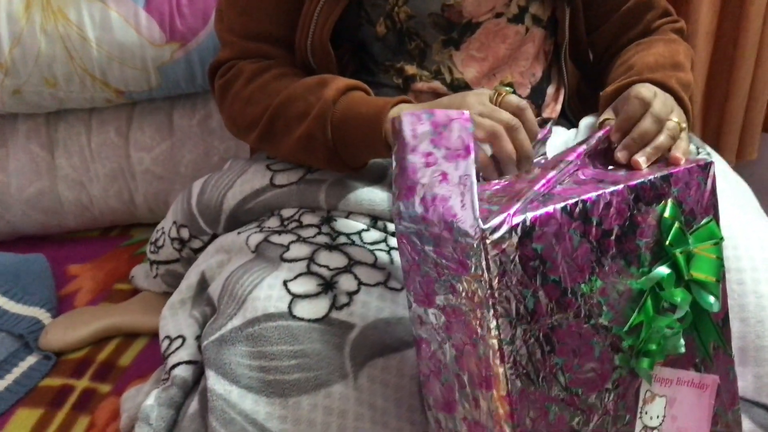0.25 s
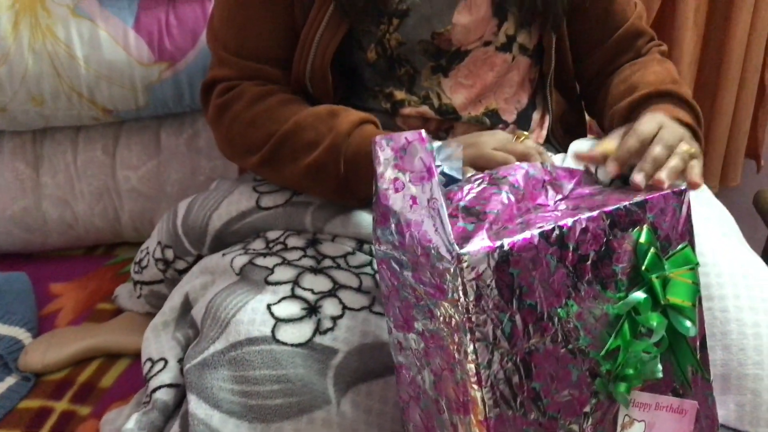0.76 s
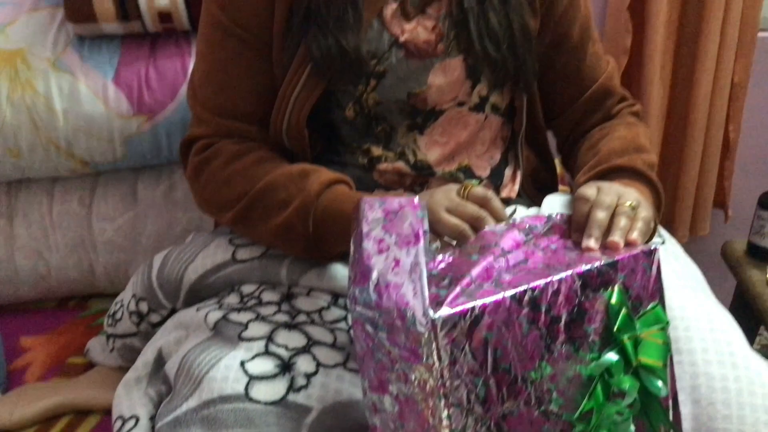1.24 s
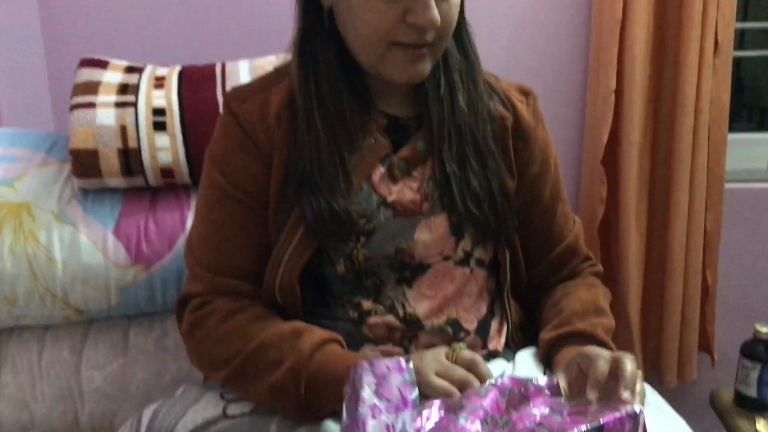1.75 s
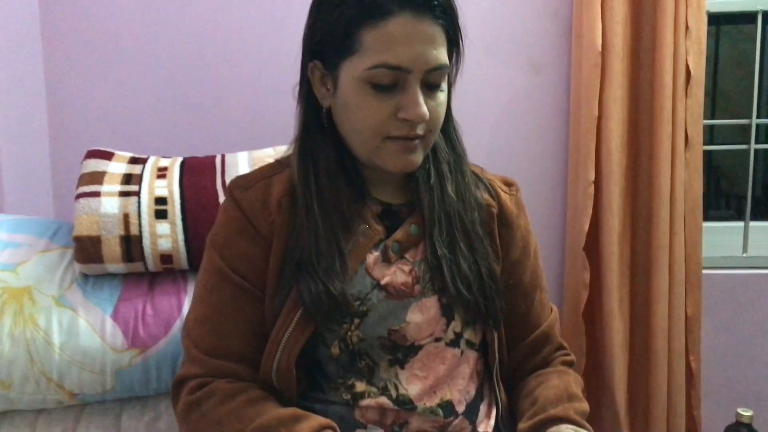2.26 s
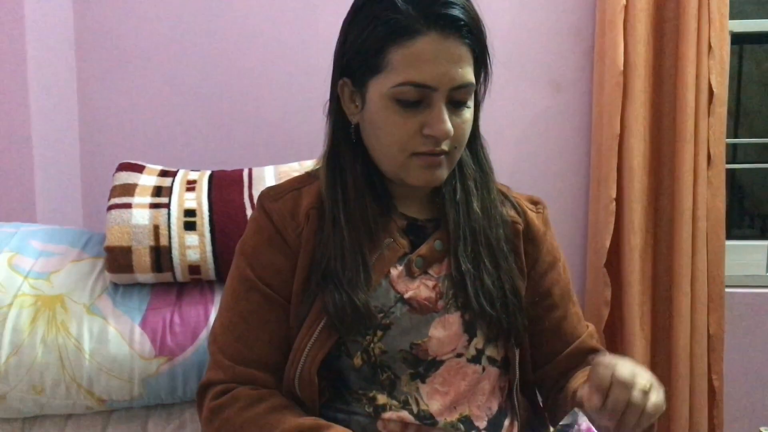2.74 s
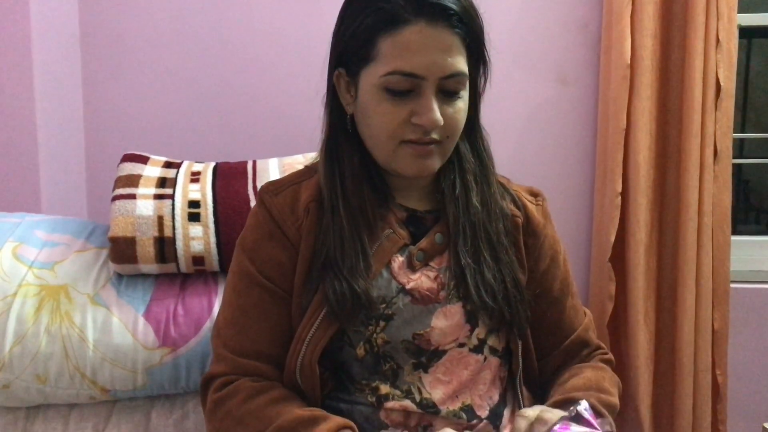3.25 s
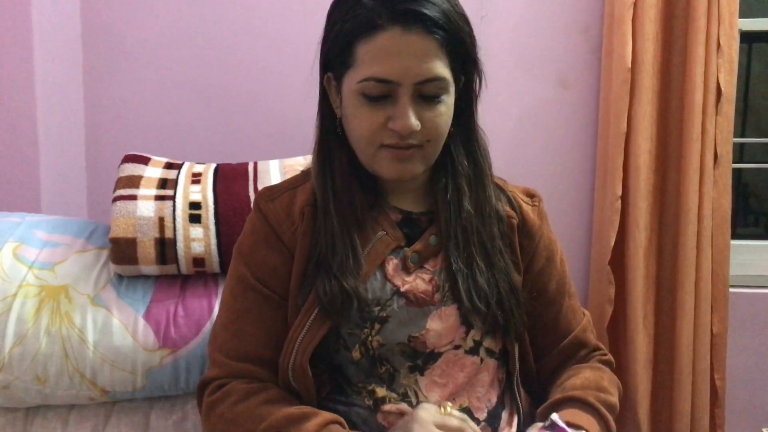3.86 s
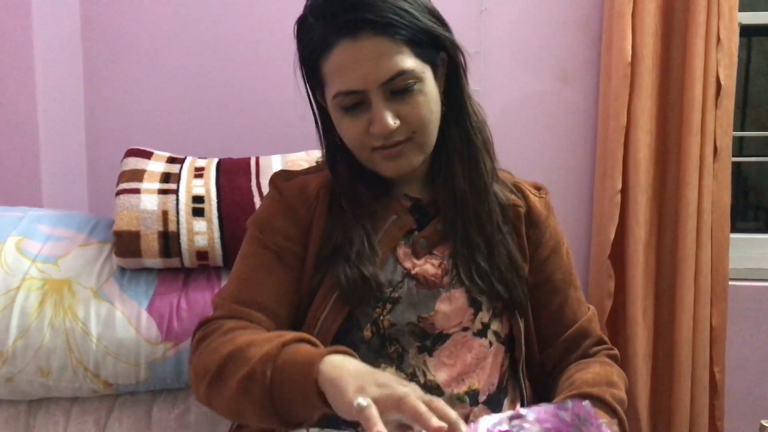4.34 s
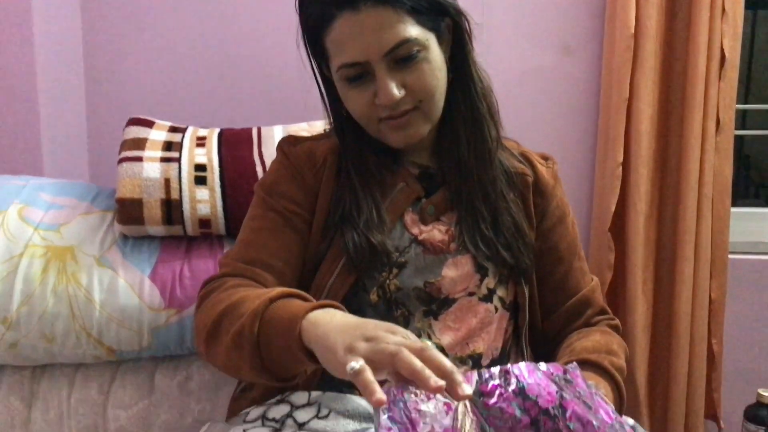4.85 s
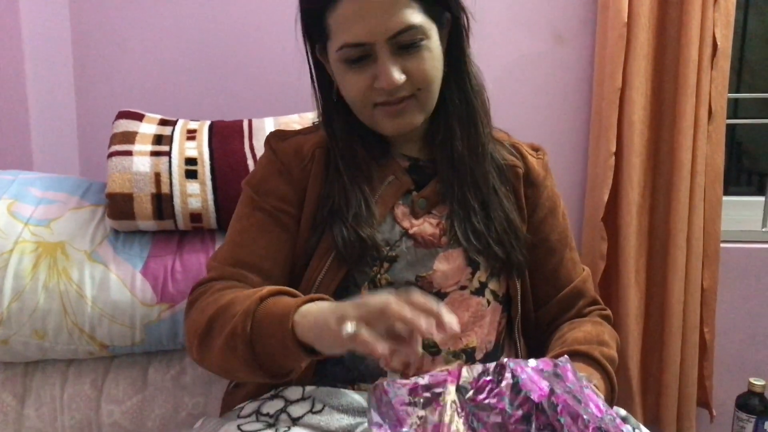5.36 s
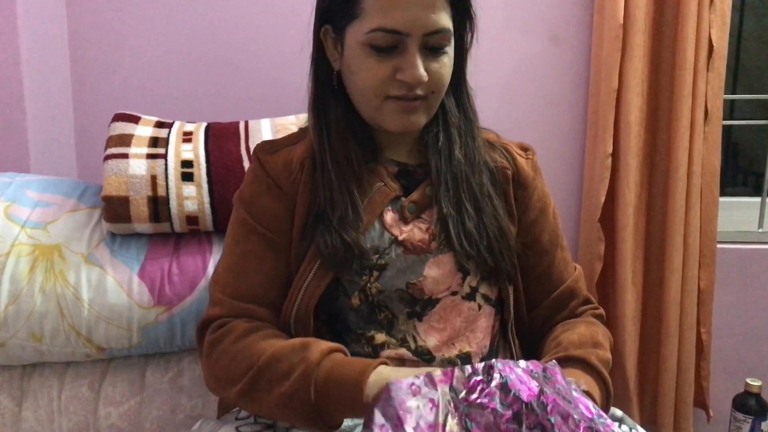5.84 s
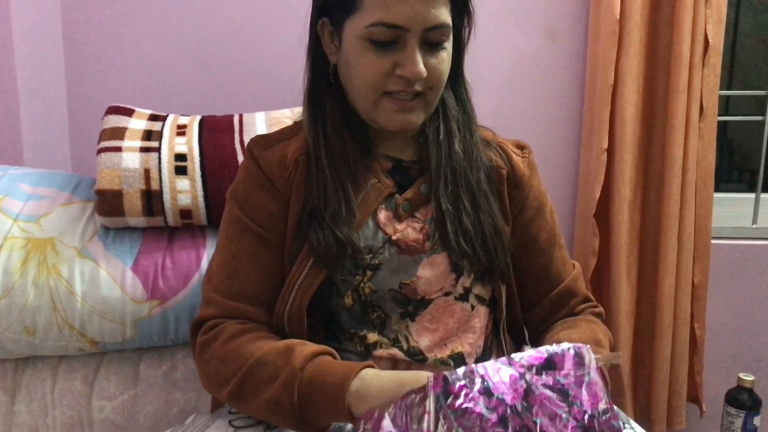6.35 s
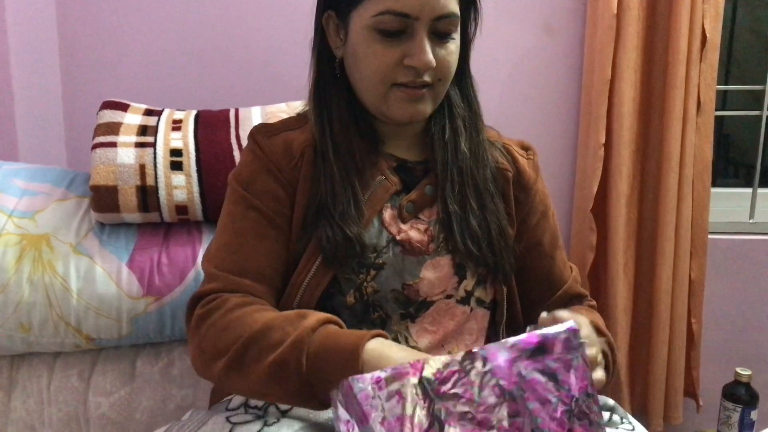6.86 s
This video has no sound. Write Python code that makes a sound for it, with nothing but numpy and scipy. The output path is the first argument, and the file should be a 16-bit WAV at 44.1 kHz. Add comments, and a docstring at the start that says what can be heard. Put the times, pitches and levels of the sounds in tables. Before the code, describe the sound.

Close, dry crinkling of gift foil: dense swarms of tiny crackles and sharp snaps at first, box bumps ringing low and brief beneath. It eases to soft rustling, surges once more with two thuds, and nearly dies away. Near the end a little tape zip leads to the hardest cracks, faint thuds and last snaps. A quiet bedroom hums low behind, with light early reflections picked up by a handheld phone.

```python
"""Hands pull foil wrapping off a cardboard box in a small quiet bedroom; a murmur and faint hiss run under it all.
0-2.9 s: creases snap sharply (slips plus brief modes), buckle swarms crackle, bumps thud (ringing box modes).
2.9-3.7 s: gentler, limper foil. 3.8-4.4 s: firm pulls again, with two thuds. 4.6-5.9 s: mostly faint crackle.
5.9-7.1 s: a tiny zip of tape (stick-slip), the loudest snaps near 6.3 s, faint thuds, then last snaps.
Slack folds pop hollowly here and there (close modes); the room adds early reflections and a dull, diffuse tail."""
import sys
import numpy as np
from scipy import signal
from scipy.fft import rfft, irfft
from scipy.io import wavfile
from scipy.ndimage import uniform_filter1d

SR = 44100
rng = np.random.default_rng(int(sys.argv[2]) if len(sys.argv) > 2 else 0)


def digitize_waveform(pressure):
    """Quantize a signal to 16-bit integers and store it at the path in sys.argv[1].

    Rows of a 2-D input are taken as channels; values are limited to [-1, 1].
    """
    field = np.atleast_2d(pressure).T
    bounded = np.clip(field, -1, 1)
    quanta = np.round(bounded * 32767).astype(np.int16)
    wavfile.write(sys.argv[1], SR, quanta)


N = 313110
TIME_S = np.arange(N) / SR


def undb(db):
    """Decibels to amplitude gain."""
    return 10 ** (np.asarray(db) / 20)


def rms(x):
    """Root mean square."""
    return np.sqrt(np.mean(x ** 2) + 1e-20)


def unit(x):
    """Scale to an energy of one."""
    return x / np.sqrt(np.sum(x ** 2) + 1e-20)


def fade(t_s, t60_s):
    """Exponential decay, 60 dB down after t60_s."""
    return np.exp(-np.log(1000) * t_s / t60_s)


def add(track, at_s, sound):
    """Mix a sound into the track at at_s."""
    start = int(np.clip(at_s * SR, 0, N - 1))
    track[start:start + len(sound)] += sound[:N - start]


def butter(hz, kind, order=3):
    """Butterworth coefficients."""
    return signal.butter(order, hz, kind, fs=SR)


def colour(x, points):
    """Filter by a spectrum of (f/Hz, level/dB) points, interpolated over log frequency."""
    points_hz, points_db = np.transpose(points)
    bins_hz = np.maximum(np.fft.rfftfreq(len(x), 1 / SR), 1)
    gain_db = np.interp(np.log(bins_hz), np.log(points_hz), points_db)
    return irfft(rfft(x) * undb(gain_db), len(x))


def flicker(hold_s):
    """Random values held for hold_s and smoothed, rms of one."""
    hold = max(int(hold_s * SR), 32)
    steps = rng.standard_normal(N // 32 + 1)[np.arange(N) // hold]
    smooth = uniform_filter1d(steps, hold)
    return smooth / rms(smooth)


# still air of the room, spectrum: f/Hz, relative level per Hz/dB
AIR_SPECTRUM = [(15, -51), (25, -7.5), (133, -5), (204, -6.5), (289, -10), (322, -11), (359, -11.5),
                (410, -16), (537, -16.5), (703, -15), (782, -17), (6050, -34), (10600, -32.5), (15500, -34)]
AIR_DB = -52.5


def air():
    """Steady low murmur of the house under a faint hiss: coloured noise."""
    noise = colour(rng.standard_normal(N), AIR_SPECTRUM)
    noise = signal.lfilter(*butter(49, "high"), noise)
    return noise / rms(noise) * undb(AIR_DB)


def bedroom(x, wet_db, t60_s, dull_hz=6000, first_s=.006, size=22000, count=10):
    """A few early reflections and a diffuse tail, dulled by bedding and curtains."""
    t_s = np.arange(size) / SR
    noise = rng.standard_normal(size)
    reflections = rng.integers(int(first_s * SR), int(.03 * SR), count)
    noise[reflections] += 9 * rng.choice([-1, 1], count)
    dulled = signal.lfilter(*butter(dull_hz, "low", order=1), noise)
    tail = dulled * fade(t_s, t60_s) * (t_s > first_s)
    return x + undb(wet_db) * signal.fftconvolve(x, unit(tail))[:N]


def far_wall(x, lag_s=0.058, echo_db=-15, dull_hz=350):
    """The body of a thud comes back once from across the room."""
    body = signal.lfilter(*butter(dull_hz, "low"), x)
    return x + undb(echo_db) * np.interp(TIME_S - lag_s, TIME_S, body, left=0)


# bumps on the box: t/s, level before gain_db/dB, hardness/(dB per octave), ring time factor
# (a hand on the box shortens the ring)
BOX_BUMPS = [(0.0874, -15, -5, 0.81), (0.525, -39, -5, 1.7), (1.5425, -17.5, -0.5, 0.7), (2.149, -23, 1, 1),
             (2.386, -34, 2.5, 0.89), (2.4228, -15, -2.5, 0.98), (2.484, -26.5, -1, 1.1),
             (2.631, -36, 1, 1.1), (4.226, -25.5, -7.5, 1.3), (4.388, -22.5, -1.5, 0.45),
             (6.296, -30.5, 8, 0.49), (6.357, -26.5, 6, 0.35), (6.365, -26.5, 1.5, 1.04),
             (6.517, -40, 2.5, 1), (6.578, -38.5, 3.5, 0.93)]
# cardboard modes: nominal f/Hz, level/dB, t60 before the ring factor/s
BOX_MODES = [(160, -8, 0.084), (180, -1.5, 0.09), (216.2, -4, 0.049), (282, -3, 0.068), (396, -2.5, 0.03),
             (620, -17, 0.022), (635, -4.5, 0.025), (1176, -15.5, 0.019), (1380, -14.5, 0.014)]


def box(gain_db=4, travel_s=0.002, push_cycles=0.37, detune=0.022, cancel_hz=160, size=9000):
    """Bumps ring the cardboard; high bending waves travel faster, so each thud drops in pitch."""
    out, t_s = np.zeros(N), np.arange(size) / SR
    mode_hz, mode_db, t60_s = np.transpose(BOX_MODES)[:, :, None]
    octaves = np.log2(mode_hz / mode_hz[1])
    for at_s, db, hardness_db, ring_factor in BOX_BUMPS:
        hz = mode_hz * (1 + detune * rng.standard_normal(mode_hz.shape))  # the grip shifts the modes
        age_s = np.maximum(t_s - travel_s * (mode_hz[1] / mode_hz), 0)
        ring = np.sin(2 * np.pi * hz * age_s) * fade(age_s, ring_factor * t60_s)
        modes = undb(mode_db + hardness_db * octaves) * ring
        push = 1 - np.exp(-age_s * hz / push_cycles)  # a soft hand builds each mode up gradually
        add(out, at_s, undb(db + gain_db) * np.sum(push * modes, axis=0))
    # at low pitch the air slips round the panel and little is radiated
    return signal.lfilter(*butter(cancel_hz, "high"), out)


# slack folds popping over: t/s, level before gain_db/dB, nominal f/Hz
FOLD_POPS = [(0.184, -29, 1490), (0.22, -26, 2520), (1.374, -33.5, 2350), (2.635, -21.5, 2430),
             (3.484, -35, 1690), (4.008, -41, 1090), (6.026, -33, 1870), (6.151, -35.5, 2130),
             (6.199, -28.5, 1910), (6.556, -21.5, 2470)]


def folds(gain_db=20, cycles=16, spread=0.065, size=900, count=4):
    """A slack fold pops over with a short hollow tone, a cluster of close modes."""
    out, t_s = np.zeros(N), np.arange(size) / SR
    for at_s, db, pitch_hz in FOLD_POPS:
        hz = pitch_hz * (1 + spread * rng.standard_normal((count, 1)))
        modes = np.sin(2 * np.pi * hz * t_s) * fade(t_s, cycles / pitch_hz)
        add(out, at_s, undb(db + gain_db) * unit(modes.sum(axis=0)))
    return out


def tape(start_s=6.045, length_s=0.047, slips_hz=215, db=-33, breadth_db=-9, length_ms=.3, jitter_s=0.00028):
    """Tape peels in nearly even stick-slip steps, a tiny zip; rows as in CREASE_SNAPS."""
    times_s = start_s + np.arange(0, length_s, 1 / slips_hz)
    return [(at_s + jitter_s * rng.standard_normal(), db, breadth_db, length_ms) for at_s in times_s]


# pulls and squeezes: t at full force/s, crackle level/dB, rise over 20 dB/s, hold/s, slackness/dB
# (slack foil sounds lower)
SHEET_PULLS = [(0.08, -28, 0.25, .025, 2), (0.215, -22, 0.085, 0.018, -3), (0.306, -39, .05, 0.11, 3.5),
               (0.477, -36, 0.025, 0.0055, 1.5), (0.53, -32.5, 0.026, 0.056, -3.5),
               (0.652, -41, 0.038, 0.12, 2), (0.87, -46, 0.13, 0.13, -1.5), (1, -41, 0.13, 0.11, -1),
               (1.102, -36.5, 0.053, .02, 4.5), (1.166, -35, .02, 0.1, -2), (1.288, -33, 0.062, .025, -1),
               (1.354, -31, .01, .035, -2.5), (1.436, -32.5, 0.12, 0.085, -0.5),
               (1.612, -36.5, .1, 0.05, 0), (1.705, -27, 0.16, 0.0074, -3), (1.855, -36.5, 0.04, .01, -2.5),
               (1.956, -25.5, 0.053, 0.0034, -1.5), (2.044, -31, 0.055, 0.03, -1.5),
               (2.157, -32, 0.07, 0.23, -3), (2.382, -38, .02, .03, -1), (2.432, -21, 0.0082, 0.068, 4),
               (2.582, -26, 0.15, 0.15, -0.5), (2.779, -35.5, 0.081, 0.02, -1),
               (3.024, -47, 0.18, 0.03, 5.5), (3.21, -43.5, 0.16, 0.017, 5.5),
               (3.279, -39, 0.011, 0.011, 1.5), (3.392, -42.5, 0.046, 0.044, 4),
               (3.535, -31, 0.07, 0.014, 1), (3.673, -42.5, .1, 0.073, 5), (3.826, -33.5, 0.36, 0.066, 2.5),
               (4.005, -39.5, 0.1, 0.021, 2), (4.144, -40.5, 0.0055, 0.037, 1.5),
               (4.21, -29, 0.028, .015, 6.5), (4.265, -24, 0.012, 0.076, 1.5),
               (4.365, -24, .07, 0.022, 4.5), (4.597, -47.5, 0.088, 0.019, 6.5),
               (4.713, -42, 0.039, 0.014, 5), (4.806, -52, .05, 0.015, 3), (5.346, -37, .02, 0.12, 2),
               (5.648, -48, .05, 0.13, 3.5), (5.834, -36.5, 0.06, 0.085, 7.5),
               (5.954, -29.5, 0.097, 0.023, 4.5), (6.094, -35.5, .1, 0.15, -4.5),
               (6.17, -38.5, 0.082, 0.08, -3), (6.267, -32, 0.064, 0.19, 3.5), (6.523, -24, 0.046, 0.02, 3),
               (6.61, -41.5, 0.092, 0.15, 11.5), (6.732, -32.5, .01, 0.12, 7),
               (6.902, -27, 0.065, 0.056, 2.5)]
RELEASE_S, SAG_DB_PER_S, REST_DB = 0.12, 13.5, -76.5  # fall over 20 dB; easing from full force on; hands at rest
FIRM_DB, LIMP_DB_PER_DB = -33.5, 0.11  # below a firm pull the sheet goes limp


def handling():
    """Effort and slackness in dB: pulls build up, ease, die away; gentle handling leaves the foil limp."""
    power, slack = np.full(N, undb(REST_DB) ** 2), np.zeros(N)
    for full_s, db, rise_s, hold_s, slack_db in SHEET_PULLS:
        age_s = TIME_S - full_s
        rising = np.maximum(-age_s, 0) / max(rise_s, .002)
        falling = np.maximum(age_s - hold_s, 0) / RELEASE_S
        fall = rising + falling
        near = fall < 3  # ignore below -60 dB
        sag_db = SAG_DB_PER_S * np.maximum(age_s[near], 0)
        pull = undb(db - 20 * fall[near] - sag_db) ** 2
        power[near] += pull
        slack[near] += pull * slack_db
    effort_db = 10 * np.log10(power)
    return effort_db, slack / power + LIMP_DB_PER_DB * (FIRM_DB - effort_db)


def small_creases(effort_db, slack_db, rate_hz=19, over_db=8, gentle_gain=0.25, scatter_db=2.0,
                  breadth_db=-3, breadth_scatter_db=6, length_ms=0.46, count=400):
    """Lesser creases snap at random, following effort but standing out in gentle handling; CREASE_SNAPS rows."""
    gaps, chance = rng.gamma(2, .5, count), rng.standard_normal((count, 3))
    times_s = np.cumsum(gaps) / rate_hz
    effort = np.interp(times_s, TIME_S, effort_db)
    slack = np.interp(times_s, TIME_S, slack_db)
    db = effort + over_db + gentle_gain * (FIRM_DB - effort) + scatter_db * chance[:, 0]
    breadth = breadth_db + slack + breadth_scatter_db * chance[:, 1]
    lengths_ms = length_ms * np.exp(.5 * chance[:, 2])
    rows = np.transpose([times_s, db, breadth, lengths_ms])
    return list(rows[times_s < TIME_S[-1]])


def flurries(effort_db, creases, flurry_db=-7, t60_s=.07, load_share=.45):
    """A snapping crease loads the foil around it; crackle leaps higher in a harder pull. Returns dB."""
    power, decay = undb(effort_db) ** 2, fade(TIME_S[:SR // 10], t60_s)
    for at_s, db, _, _ in creases:
        leap_db = flurry_db + (1 - load_share) * db + load_share * effort_db[int(at_s * SR)]
        add(power, at_s, (undb(leap_db) * decay) ** 2)
    return 10 * np.log10(power)


def facet(slip_s, ring_db, cycles=11, spread_db=-14, spread_t60_s=0.1, size=1100, count=5):
    """One patch of foil flips: a jerky slip, a few brief modes, and waves spreading through the sheet."""
    t_s = np.arange(size) / SR
    slip = unit(rng.standard_normal(size) * np.exp(-(t_s / slip_s) ** 2))
    hz = np.exp(rng.uniform(np.log(1600), np.log(15000), (count, 1)))
    onset_s = slip_s * rng.random((count, 1))  # modes start at scattered times as the crease runs
    age_s = np.maximum(t_s - onset_s, 0)
    modes = hz * np.sin(2 * np.pi * hz * age_s) * fade(age_s, cycles / hz)
    ring = unit(np.sum(modes, axis=0))
    spread = unit(rng.standard_normal(size) * fade(t_s, spread_t60_s))
    return unit(slip + undb(ring_db) * ring + undb(spread_db) * spread)


LOW_EDGE_HZ, HIGH_EDGE_HZ = 2500, 7000


def registers(x):
    """Split into treble, middle and low middle."""
    edges = [(HIGH_EDGE_HZ, "high"), ([LOW_EDGE_HZ, HIGH_EDGE_HZ], "band"), (LOW_EDGE_HZ, "low")]
    return [signal.lfilter(*butter(hz, kind), x) for hz, kind in edges]


def avalanches(effort_db, rate_hz=480, rate_growth=0.55, t60_s=.011, scatter_db=3.5, rest=.6, size=1200):
    """One buckle trips its neighbours: activity leaps up and dies within milliseconds; mean of one."""
    per_second = rate_hz * undb(rate_growth * (effort_db + 36))  # hard pulls merge the runs into one rush
    hits = rng.random(N) < per_second / SR
    triggers = hits * undb(scatter_db * rng.standard_normal(N)) / per_second
    runs = np.abs(signal.fftconvolve(triggers, fade(np.arange(size) / SR, t60_s))[:N])
    return (rest + runs / runs.mean()) / (rest + 1)


# taut foil against its treble; the middle follows slackness only in part
MIDDLE_DB, LOW_DB, MIDDLE_SHARE = -5, -10, 0.38


def crackle(effort_db, slack_db, rate_hz=2100, rate_growth=.5, scatter_db=3.0, even_s=0.087,
            treble_db=-2.0, patchy_db=1.2, rub_db=-13, count=96):
    """Swarms of tiny buckles; harder handling sets off more of them, and slack foil sounds lower."""
    burst = avalanches(effort_db)
    per_second = rate_hz * burst * undb(rate_growth * (effort_db + 39.0))
    at = np.flatnonzero(rng.random(N) < per_second / SR)
    chance = np.minimum(rng.exponential(size=N), 3.5)  # many small, a few large
    sizes = (np.sqrt(burst) * undb(scatter_db * chance))[at]
    patches = rng.integers(0, count, N)[at]
    slips_s = 0.00048 * undb(4.38 * rng.standard_normal(count))
    facets = [facet(slip_s, ring_db=-2.5) for slip_s in slips_s]
    swarm = np.zeros(N)
    for i, size, patch in zip(at, sizes, patches):
        add(swarm, i / SR, size * facets[patch])
    swarm += undb(rub_db) * rms(swarm) * rng.standard_normal(N)  # foil sliding over foil
    # buckles share the work of the hands: even out the swarm, then let effort set the level
    window = int(even_s * SR)
    power = uniform_filter1d(uniform_filter1d(swarm ** 2, window), window)
    swarm /= np.sqrt(power + 1e-12)
    # bursts come from different folds: each register flickers by itself
    bands = [band * undb(patchy_db * flicker(hold_s=.004)) for band in registers(swarm)]
    shares_db = treble_db, MIDDLE_DB + MIDDLE_SHARE * slack_db, LOW_DB + slack_db
    return sum(band / rms(band) * undb(effort_db + db) for band, db in zip(bands, shares_db))


# large creases snapping through: t/s, level before gain_db/dB, breadth/dB, length before slip_share/ms
# (a broad crease sounds lower)
CREASE_SNAPS = [(0.0723, -20, -6, 0.56), (0.155, -21, -6, .3), (0.2387, -23, -5, 1.3), (0.3597, -26, 0, .7),
                (0.5337, -23.5, 0, 0.26), (0.554, -27, -15, 0.17), (0.6665, -18, -16, 0.68),
                (0.8588, -28, -1, 0.18), (1.011, -26, -5, 1.05), (1.1047, -22, -9, .8),
                (1.1675, -22.5, 2, 0.73), (1.237, -21.5, -9, 0.11), (1.3094, -18, -5, 0.36),
                (1.3534, -21.5, -1, 0.69), (1.4477, -16.5, 1.5, 2.3), (1.6014, -25, -1, 1.2),
                (1.641, -29, 0, 0.16), (1.7143, -13, -13, 0.65), (1.855, -21, -17, .7),
                (1.9637, -14, -2, .6), (2.112, -22, -12, .2), (2.213, -15.5, -3, 0.27),
                (2.261, -24, 3, 0.23), (2.3177, -24, 5.5, 0.67), (2.425, -11, 0.5, 1.1),
                (2.43, -11, 2, 0.27), (2.4518, -15, -1, 0.35), (2.7034, -15.5, -4, 0.27),
                (2.8505, -27, -15, 0.13), (2.934, -20, -16.5, .35), (3.0047, -36.5, 2, 0.9),
                (3.0796, -39.5, 19, .4), (3.1505, -28, 2, .45), (3.2106, -24.5, 4, 1.6),
                (3.2746, -26.5, 2, 0.85), (3.2874, -22.5, 0, 0.92), (3.36, -27, -4, .4),
                (3.4066, -32, 0, 0.99), (3.485, -29.5, 2, 0.79), (3.774, -23, 6, .3),
                (3.8208, -14, 4, 0.29), (3.851, -17, 18, 0.53), (3.8713, -24.5, 15, 0.94),
                (4.0258, -25.5, 16, 0.43), (4.1453, -26, -3.5, 0.92), (4.231, -23, 2, 1),
                (4.2694, -22, 0, 0.49), (4.6429, -31.5, 10, 1.67), (5.0175, -38.5, 0, .9),
                (5.1228, -45, 10, 0.59), (5.259, -25, 3.5, 0.345), (5.402, -27, 1, 0.63),
                (5.4387, -28.5, 8, 0.42), (5.4938, -30.5, 7, 0.89), (5.5736, -39, 27, 0.75),
                (5.6397, -32, 5, 0.47), (5.9505, -13, 12, 0.068), (5.981, -28, 11, 0.42),
                (6.1683, -19, 5, 0.48), (6.1746, -20.5, 13, 0.26), (6.248, -15.5, 4, .6),
                (6.2933, -6.5, 5.5, 1), (6.3525, -12.5, 9, 0.19), (6.3566, -8, -7, 0.75),
                (6.3644, -15.5, 2, 0.41), (6.7325, -21, 8, 0.96), (6.75, -22, -1, 0.33),
                (6.847, -16, -14, 2), (6.9475, -13.5, -16, 0.18)]
SNAP_LOW_DB, SNAP_LOW_SHARE = -6, 1.23  # low middle against treble, and its growth with breadth


def snaps(creases, gain_db=19.0, slip_share=1.41, thin_hz=520):
    """Creases give way one by one, each with its own slip time and colour."""
    out = np.zeros(N)
    for at_s, db, breadth_db, length_ms in creases:
        length_s = max(length_ms, .1) / 1000
        flip = facet(slip_s=slip_share * length_s, ring_db=-8)
        shares_db = 0, breadth_db, SNAP_LOW_DB + SNAP_LOW_SHARE * breadth_db
        snap = sum(undb(share) * band for band, share in zip(registers(flip), shares_db))
        add(out, at_s, undb(db + gain_db) * unit(snap))
    # a narrow crease moves too little air to carry any bass
    return signal.lfilter(*butter(thin_hz, "high", order=2), out)


# colour of the foil: f/Hz, level/dB
FOIL_COLOUR = [(30, -26), (90, -3.5), (170, -0.5), (300, 0), (480, -3.5), (1000, -1.5), (1600, -0.5),
               (2300, -2.5), (3200, 1.5), (4200, 3.2), (5600, 0.5), (7600, -1), (11300, 4), (13600, 1),
               (15400, 5)]


def scene():
    """Foil and box in the bedroom."""
    effort_db, slack_db = handling()
    creases = list(CREASE_SNAPS) + small_creases(effort_db, slack_db)
    crackle_db = flurries(effort_db, creases)
    sheet = crackle(crackle_db, slack_db) + folds() + snaps(creases + tape())
    foil = bedroom(colour(sheet, FOIL_COLOUR), wet_db=-14.0, t60_s=0.51)
    thuds = bedroom(far_wall(box()), wet_db=-10.5, t60_s=0.44)
    return (air() + thuds + foil)[None]


# hollows in the response of the microphone port: f/Hz, width/Hz, depth/dB
PORT_HOLLOWS = [(4990, 170, -5.5), (10570, 1700, -6)]
TOP_HZ = 15700


def record(dry):
    """The microphone port cuts two hollows; the phone clips at full scale and cuts the top."""
    for hz, width_hz, depth_db in PORT_HOLLOWS:
        peak = signal.lfilter(*signal.iirpeak(hz, hz / width_hz, fs=SR), dry)
        dry = dry - (1 - undb(depth_db)) * peak
    low_pass = signal.ellip(10, .1, 70, TOP_HZ, fs=SR, output="sos")
    return signal.sosfilt(low_pass, np.clip(dry, -1, 1))


dry = scene()
out = record(dry)
digitize_waveform(out)
```